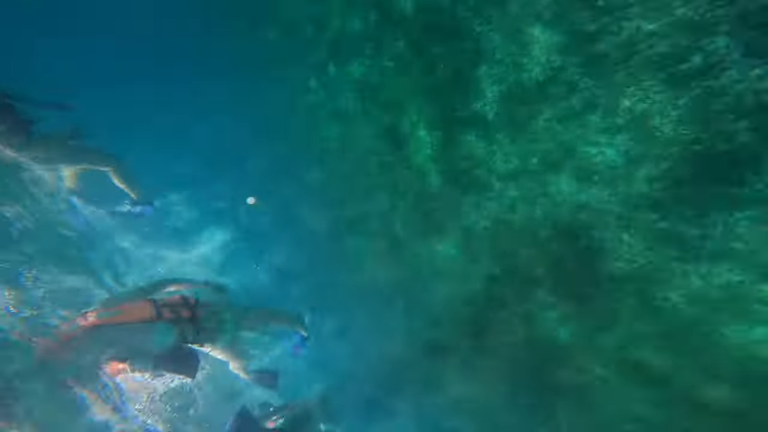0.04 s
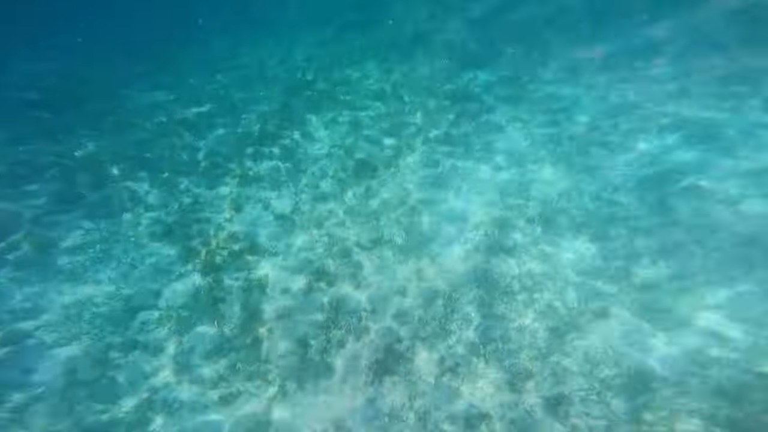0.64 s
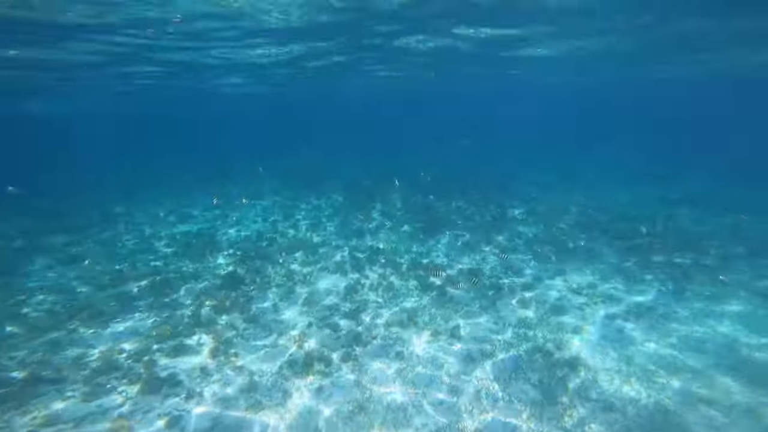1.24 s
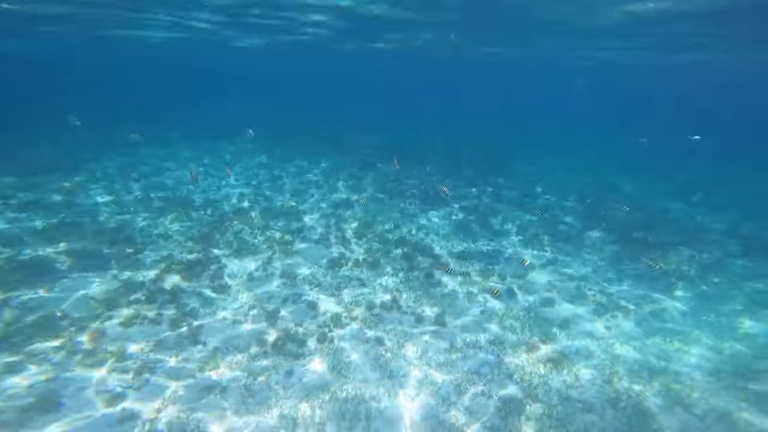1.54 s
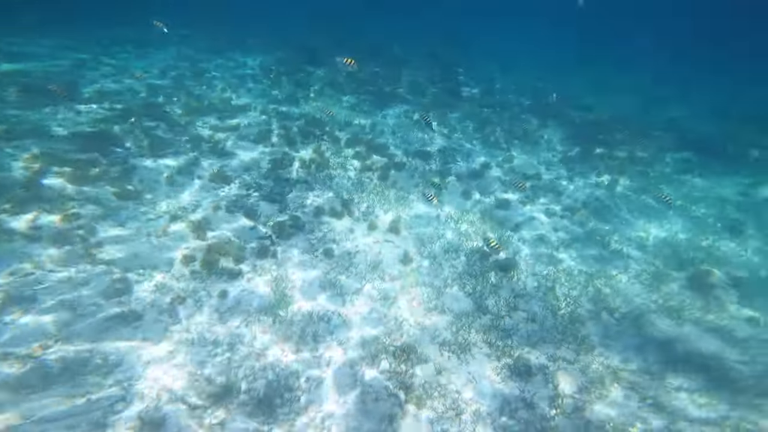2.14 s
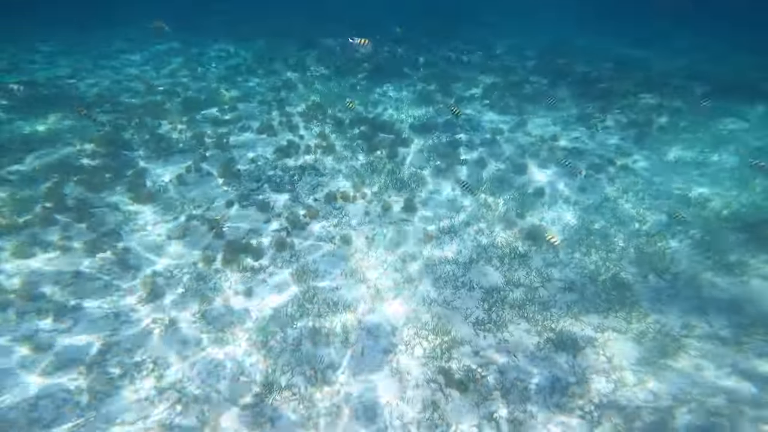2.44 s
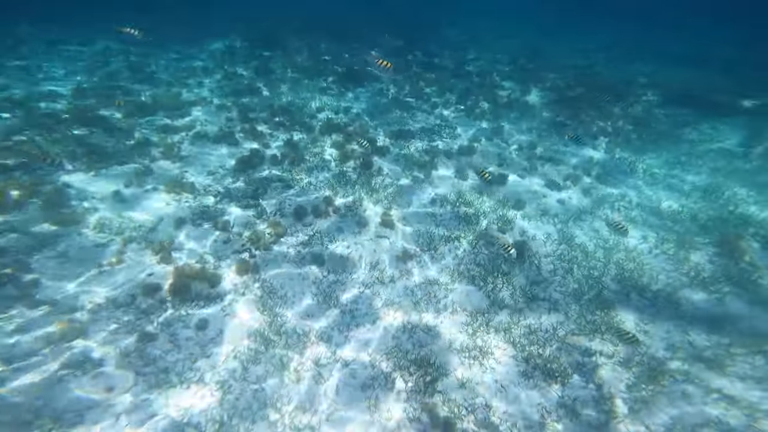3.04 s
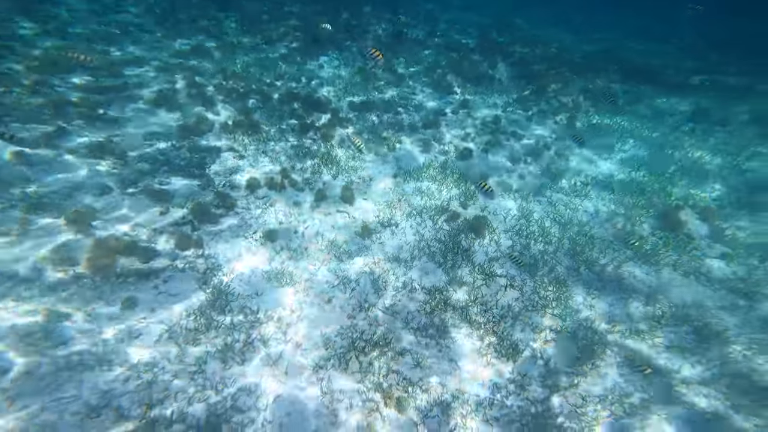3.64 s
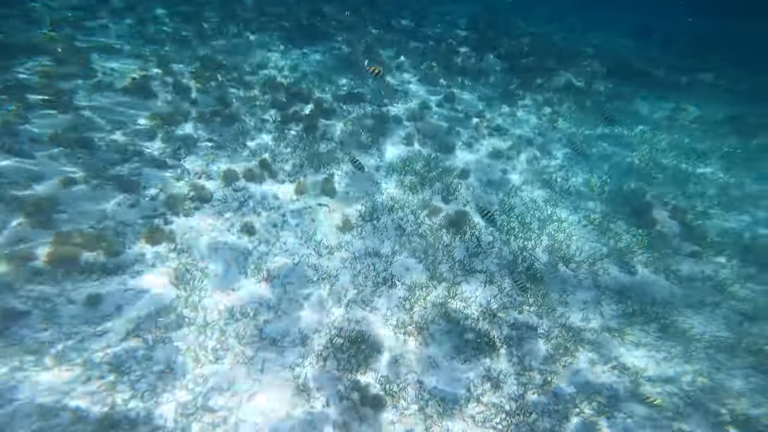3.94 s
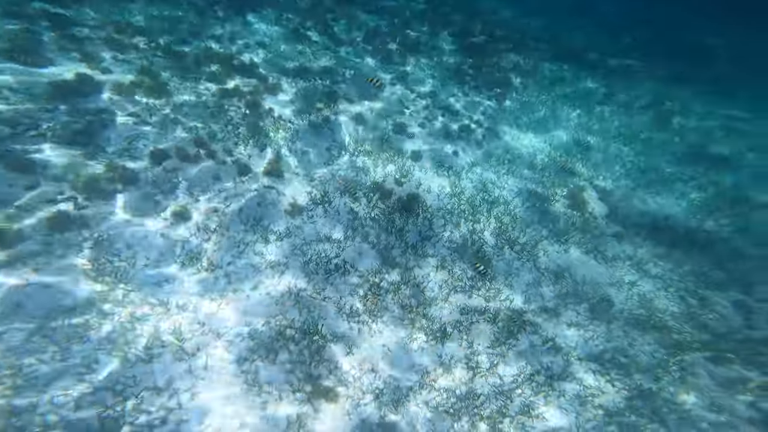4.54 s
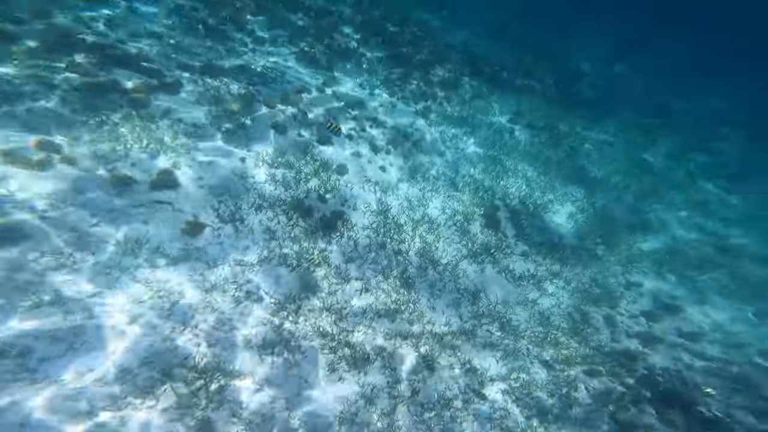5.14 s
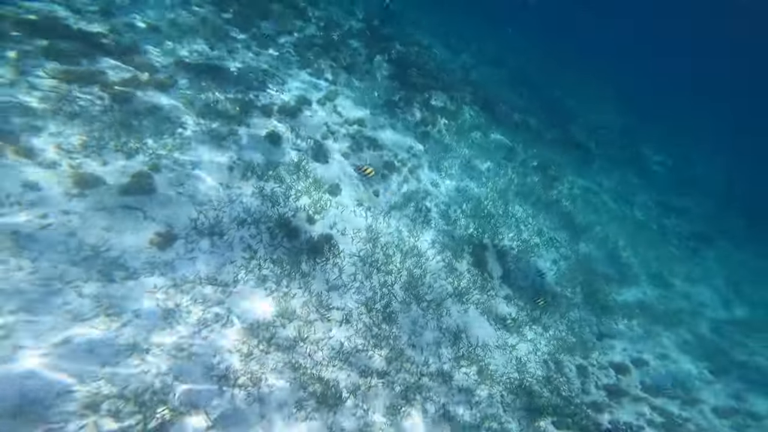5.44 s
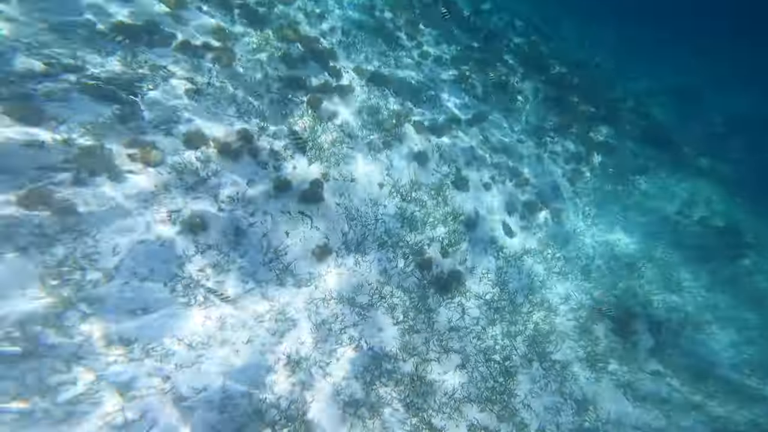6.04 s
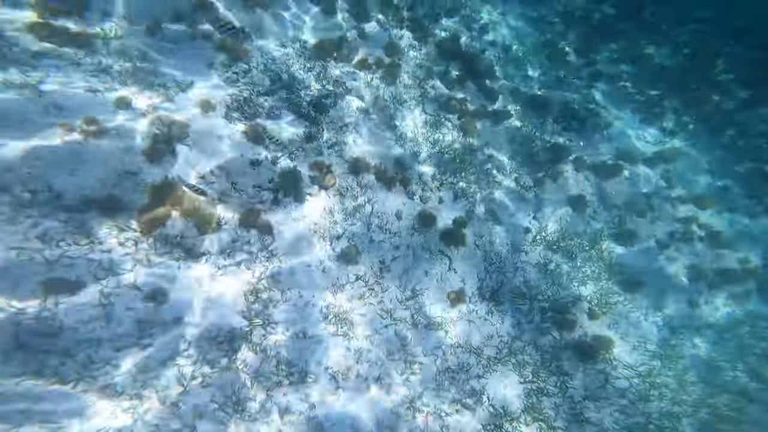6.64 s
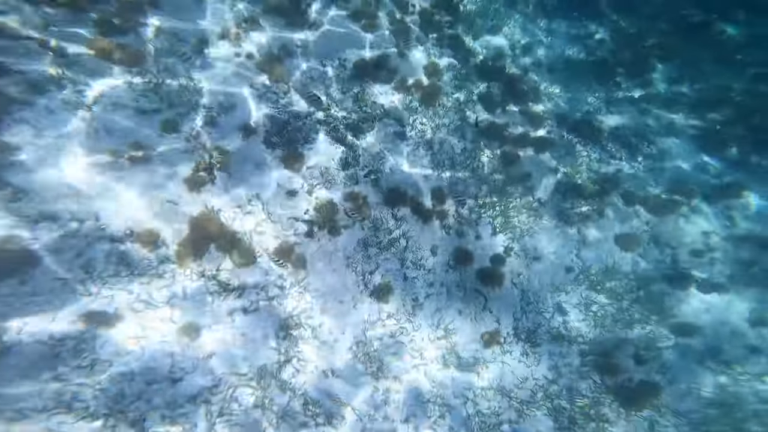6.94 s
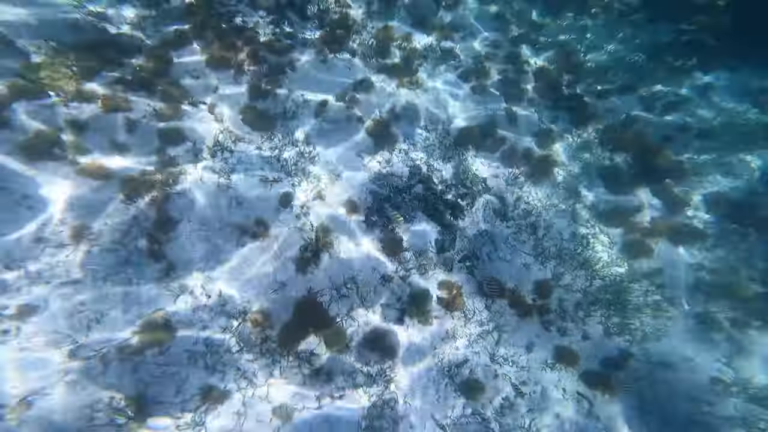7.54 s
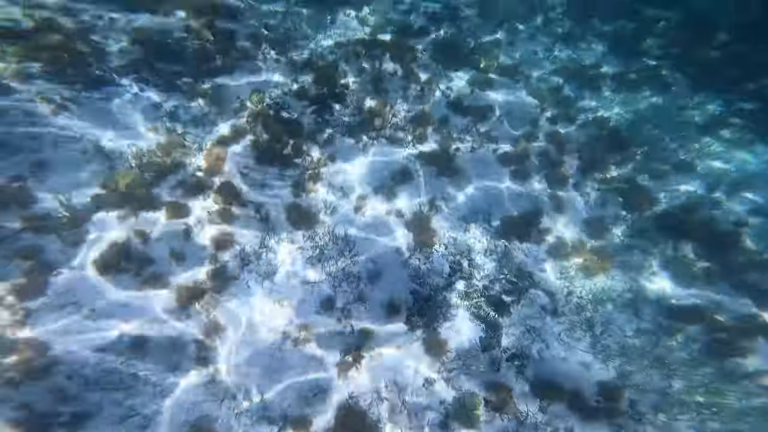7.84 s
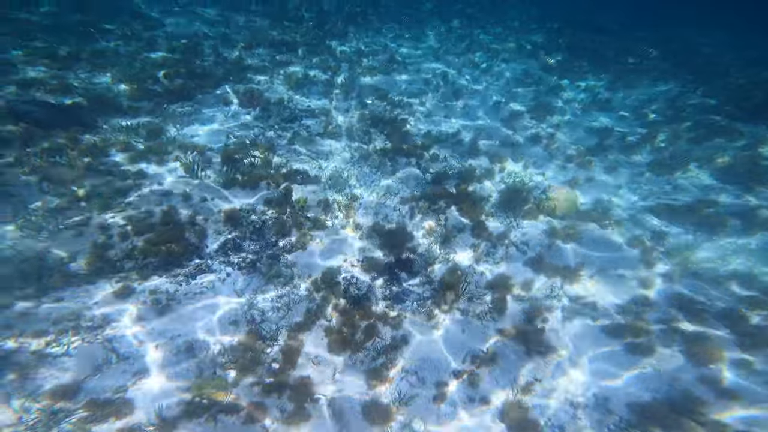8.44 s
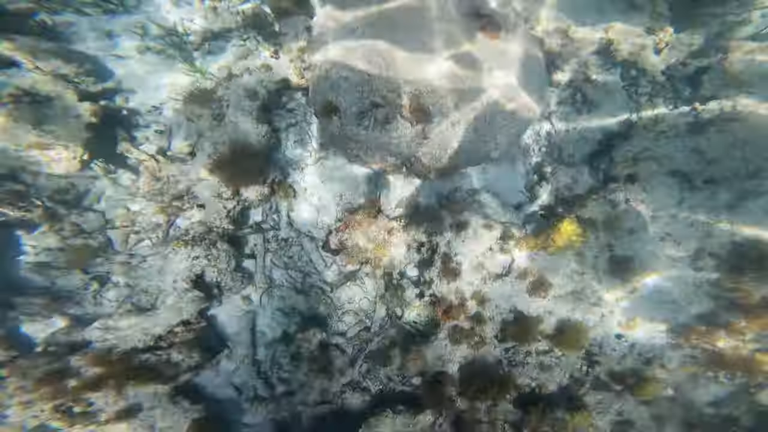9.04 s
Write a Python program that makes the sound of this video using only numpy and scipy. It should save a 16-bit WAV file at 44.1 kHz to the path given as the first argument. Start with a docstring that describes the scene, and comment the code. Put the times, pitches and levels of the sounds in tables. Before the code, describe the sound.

A muffled low rumble and soft burbling wash run throughout, heard from a hollow waterproof case just under the sea surface. From 0.2 to 1 second, close splashes crackle among glugs, snapping bubbles and dull knocks, the strongest at 0.7. A ringing glug and a sharp tick come around 1.3, as a string of bubbles rises in pitch until 1.8. Soft bumps sway the case between 2.2 and 3.2. It then grows quieter, with faint fizz and a thin hiss. Dull pops and a low bloop fall between 4.5 and 5.3, followed by more knocks and swelling rumble until 6.1. Glugs and small ringing bubbles cluster from 6.7 to 7, with another low bloop at 7.3. Louder glugs arrive around 7.9, then a sharp snap at 8.1. A tick, a glug and three hollow knocks come near 8.9, and the wash continues briefly.

```python
"""Snorkelling, heard from a waterproof case

A camera in a hollow case is carried just under the sea surface, near other swimmers. Eddies rumble
round the case, and bumps set it swaying and ringing. Close by, air pockets glug, splashes crackle and
small bubbles snap. Each bubble is an oscillator, its air the spring and the water the mass: the smaller,
the higher. Behind lie the wash of the churned surface and a fine fizz, coloured by the case's modes."""
import sys
import numpy as np
from scipy import signal
from scipy.fft import rfft, irfft, next_fast_len
from scipy.io import wavfile
from scipy.ndimage import uniform_filter1d

SR = 44100
rng = np.random.default_rng(int(sys.argv[2]) if len(sys.argv) > 2 else 0)


def bounce(signal):
    """Save signal as a 16-bit WAV file at the path given by the first command-line argument."""
    frames = np.transpose(np.atleast_2d(signal))
    limited = np.clip(frames, -1, 1)
    pcm = np.round(limited * 32767).astype(np.int16)
    wavfile.write(sys.argv[1], SR, pcm)


N = 410130

# bumps on the case: (time [s], relative level [dB], hollow ring against the push [dB])
CASE_BUMPS = [(0.223, -9, -3), (0.323, -12.5, -13), (0.66, -3, -3.5), (0.715, -10, -24), (0.929, -14.5, -6),
              (2.176, -10.5, -15.5), (2.256, -9.5, -5.5), (2.326, -11.5, -19), (2.462, -14, -8),
              (2.93, -18, -26), (3.174, -14, -11), (5.328, -11.5, -0.5), (5.41, -15.5, -18),
              (5.632, -15, -7.5), (5.887, -13, -17), (5.969, -14, -8), (6.143, -15, -38),
              (6.843, -11.5, -18), (7.98, -19, -18), (8.787, -13, -7), (8.838, -16, -2), (8.934, -9.5, 0)]


def amp(db):
    """Decibels to amplitude ratio."""
    return 10 ** (np.asarray(db) / 20)


def unit(x):
    """Normalisation to an rms of one."""
    return x / np.sqrt(np.mean(x ** 2) + 1e-20)


def together(a_db, b_db):
    """Incoherent sources add in power."""
    return 10 * np.log10(amp(a_db) ** 2 + amp(b_db) ** 2)


def curve(points):
    """Linear interpolation of a level at every sample."""
    return np.interp(np.arange(N) / SR, *np.transpose(points))


def at_hz(points, hz, column=1):
    """Interpolation on a log-frequency axis."""
    table = np.array(points, float)
    return np.interp(np.log(hz + 1), np.log(table[:, 0] + 1), table[:, column])


def add(mix, s, sound):
    """Superposition of a sound on the mix, from time s."""
    part = mix[:, max(round(s * SR), 0):][:, :sound.shape[-1]]
    part += sound[..., :part.shape[1]]


def pan(gain):
    """Level difference: the left side gains what the right loses, in decibels."""
    return np.array([[gain], [1 / gain]])


def wander(hz):
    """Slow random modulation: noise low-passed at hz."""
    return unit(irfft(rfft(rng.standard_normal(N)) / (1 + (np.fft.rfftfreq(N, 1 / SR) / hz) ** 4), N))


def grains(size, per_s, spread_db):
    """Shot noise: two trains of random impulses, a few of them large."""
    sizes = amp(spread_db * np.minimum(rng.exponential(1, (2, size)), 5))
    return unit(sizes * rng.choice([-1, 1], (2, size)) * (rng.random((2, size)) < per_s / SR))


def colour(x, law_db, size=4096):
    """Minimum-phase filter with the gain law_db(hz): it rings after each click, never before."""
    db = law_db(np.fft.rfftfreq(size, 1 / SR))
    log_gain = np.log(amp(np.maximum(db, db.max() - 100)))
    log_response = signal.hilbert(np.r_[log_gain, log_gain[-2:0:-1]]).conj()
    taps = np.fft.ifft(np.exp(log_response)).real
    return signal.oaconvolve(x, taps[None, :size // 2], axes=1)[:, :x.shape[1]]


def modes_db(hz):
    """Modal response: the case lifts its resonances and dips at its antiresonances."""
    # peaks and dips of the case: (frequency [Hz], width [Hz], lift [dB])
    case_modes = [(536, 64.5, 10), (1175, 230, 5.5), (1477.6, 236, 19.5), (1862, 197, 12.5),
                  (2138, 98, -6.5), (2290, 290, 6), (4220, 190, -3.5), (4640, 140, 2), (5680, 410, 2.5)]
    return sum(db * np.exp(-2 * ((hz - f) / width) ** 2) for f, width, db in case_modes)


def through_wall(x, ring):
    """Resonant colouring: a sound takes a share (ring) of the case modes and keeps its rms."""
    rung = colour(x, lambda hz: ring * modes_db(hz))
    return unit(rung) * np.sqrt(np.mean(x ** 2))


def ports(pair):
    """Partial coherence: two unrelated signals become alike in the bass, apart where the walls flex."""
    # the two microphones: (frequency [Hz], correlation [0-1], left minus right [dB])
    microphones = [(150, 1, 0), (546, 1, 2.5), (1000, 0.53, 0), (1680, 0.68, 5), (3000, 0.34, 0),
                   (4940, 0.94, -4.5), (8400, 0.93, 3)]
    size = next_fast_len(pair.shape[1] + SR // 20)
    hz = np.fft.rfftfreq(size, 1 / SR)
    a, b = rfft(pair, size)
    same = np.clip(at_hz(microphones, hz), 0, 1)
    lean = amp(at_hz(microphones, hz, column=2) / 2)
    mid, side = a * np.sqrt((1 + same) / 2), b * np.sqrt((1 - same) / 2)
    return irfft(np.array([(mid + side) * lean, (mid - side) / lean]), size)[:, :pair.shape[1]]


def burst(drive, centre_hz, db_per_octave, ring, top_hz):
    """Source and filter: a burst at the wall takes a spectral hump, the case modes and a treble cut."""
    hump = lambda hz: -db_per_octave * np.hypot(np.log2((hz + 20) / centre_hz), .5)
    muffle = lambda hz: -10 * np.log10(1 + (hz / top_hz) ** 14)
    return ports(colour(drive, lambda hz: hump(hz) + ring * modes_db(hz) + muffle(hz)))


def wobbling_tone(turns, rough, rough_hz):
    """A bubble's wobbling wall modulates its tone in amplitude and phase."""
    noise = rng.standard_normal((2, len(turns)))
    wobble, heave = unit(signal.lfilter(*signal.butter(2, rough_hz, fs=SR), noise))
    return (1 + rough * heave) * np.sin(2 * np.pi * turns + 2 * rough * wobble)


def pinch(hz, decay_s, rise, swell_s, rough, rough_hz, hold):
    """Pinch-off excites a damped oscillation of rising pitch; a larger hold rounds the fade."""
    t = np.arange(SR // 5) / SR
    turns = np.cumsum(hz * (1 + rise * (np.tanh(t / decay_s / 2) - .3))) / SR
    shape = (1 - np.exp(-(t / swell_s) ** 2)) * np.exp(-(t / decay_s) ** hold)
    return shape / shape.max() * wobbling_tone(turns, rough, rough_hz)


def cloud(low_hz, high_hz, level_db, per_s, spread_db, smooth, gust_db, gust_hz):
    """Countless bubbles of one size class sum to a gusting band of noise, filtered by the case."""
    # transmission through the case: (frequency [Hz], gain [dB])
    transmission = [(60, -19.5), (150, -14.5), (300, -18), (430, -7), (600, -14), (880, -24.5),
                    (1150, -26.5), (1300, -32.5), (2100, -28), (2800, -22.5), (4000, -30), (5500, -35),
                    (7500, -41), (9500, -55), (14000, -75)]
    drive = grains(N, per_s, spread_db) + smooth * rng.standard_normal((2, N))
    drive *= amp(gust_db * wander(gust_hz))
    band = lambda hz: -10 * np.log10((1 + (low_hz / (hz + 1)) ** 8) * (1 + (hz / high_hz) ** 8))
    sound = ports(colour(drive, lambda hz: at_hz(transmission, hz) + modes_db(hz) + band(hz)))
    return unit(sound) * amp(level_db)


def hiss():
    """Narrow-band noise: a whistly hiss swells and stops."""
    # swell of the hiss: (time [s], relative level [dB])
    swell = [(2.4, -61.5), (3.4, -54), (5.9, -55), (7.95, -50), (8.4, -65)]
    level_db = curve(swell) - 3
    return cloud(5400, 6100, level_db, per_s=1200, spread_db=1.5, smooth=1.8, gust_db=-0.1, gust_hz=22)


def strays(low_hz, high_hz, level_db, cycles, count, rise=0.141, spread_db=4.5):
    """Single bubbles ring as damped oscillators at random moments, following their cloud's level."""
    t, out = np.arange(SR // 6) / SR, np.zeros((2, N))
    for when, pitch, size, side in rng.random((count, 4)):
        hz = low_hz * (high_hz / low_hz) ** pitch
        age = t * hz / cycles
        turns = np.cumsum(hz * (1 + rise * np.tanh(age / 2))) / SR
        ping = np.sin(2 * np.pi * turns) * np.tanh(2 * age) * np.exp(-age)
        db = level_db[int(when * N)] - spread_db * np.log(size + 0.025)
        lean = amp((side - .5) * hz / high_hz * 2)  # large bubbles sit in the middle
        add(out, when * N / SR, amp(db) * pan(lean) * ping)
    return out


def pops(decay_s=0.0061, gain_db=5.5):
    """Impulse excitation: a bubble collapses a little way off and rings the case's middle modes."""
    # dull pops: (time [s], relative peak [dB])
    collapses = [(1.929, -39), (2.2546, -37), (3.457, -33), (4.5353, -28.5), (4.8806, -30.5), (4.9697, -25),
                 (5.2568, -30), (6.763, -30), (6.899, -34), (6.946, -34), (8.021, -29.5), (8.357, -38)]
    t, out = np.arange(SR // 20) / SR, np.zeros((2, N))
    for s, db in collapses:
        puff = rng.standard_normal((2, len(t))) * np.exp(-t / decay_s)
        sound = burst(puff, centre_hz=1900, db_per_octave=9, ring=0.94, top_hz=6000)
        add(out, s, amp(db + gain_db) * sound / abs(sound).max())
    return out


def ticks(decay_s=0.00043):
    """A brief pulse has a broad spectrum: dry, bright ticks with no ring."""
    # ticks: (time [s], peak [dB])
    pulses = [(1.3277, -11), (8.7875, -20)]
    t, out = np.arange(SR // 100) / SR, np.zeros((2, N))
    for s, db in pulses:
        add(out, s, amp(db) * np.exp(-t / decay_s))
    return out


def stream(per_s=1300, scatter=0.12, cycles=3.9, spread_db=5.0, gain_db=-2.0, spurt_hz=68, bunch=0.88):
    """Pitch varies inversely with radius: ever smaller bubbles escape, so their common ring climbs."""
    # string of bubbles along the case: (time [s], relative level [dB], pitch [Hz])
    escape = [(1.24, -22, 1460), (1.30, -31.5, 1530), (1.38, -40.5, 1600), (1.47, -29, 1790),
              (1.62, -37.5, 1730), (1.71, -31, 2070), (1.746, -46, 2200)]
    times, level_db, pitch_hz = np.transpose(escape)
    t, out = np.arange(SR // 30) / SR, np.zeros((2, N))
    births = rng.uniform(times[0], times[-1], round(per_s * (times[-1] - times[0])))
    births += bunch * np.sin(2 * np.pi * spurt_hz * births) / (2 * np.pi * spurt_hz)  # air in spurts
    for s, (size, detune, side) in zip(births, rng.standard_normal((len(births), 3))):
        hz = np.interp(s, times, pitch_hz) * np.exp(scatter * detune)
        age = t * hz / cycles
        ping = np.sin(2 * np.pi * hz * t) * np.tanh(2 * age) * np.exp(-age)
        db = np.interp(s, times, level_db) + spread_db * size + gain_db
        add(out, s, amp(db) * pan(amp(2 * side + 2)) * ping)
    return through_wall(out, ring=0.35)


def bubbles(cycles=7.7, shed_count=3, shed_db=-15.5, shed_s=0.018, shed_octaves=0.54):
    """Minnaert resonance: bubbles ring by size, chirp up as they near the surface and shed smaller ones."""
    # free bubbles close by: (time [s], level [dB], pitch [Hz])
    free_bubbles = [(.222, -16, 1134), (.458, -26, 1900), (0.842, -22.5, 1345), (.894, -22, 965),
                    (0.935, -15.5, 1600), (1.257, -17, 3060), (2.063, -30, 1470), (2.303, -28.5, 1020),
                    (2.317, -30, 1340), (3.555, -26.5, 4020), (4.938, -15, 305), (6.764, -25.5, 2930),
                    (6.82, -34, 3300), (6.827, -30, 1500), (6.844, -24, 780), (6.89, -33, 1065),
                    (6.947, -28, 1065), (7.306, -17.5, 351), (7.901, -20, 830), (8.019, -21, 2010),
                    (8.49, -32.5, 1630), (8.625, -30.5, 1730)]
    out = np.zeros((2, N))
    chirp = lambda hz: pinch(hz, cycles / hz, 0.092, swell_s=0.0012, rough=0.26, rough_hz=297, hold=1.1)
    for s, db, hz in free_bubbles:
        add(out, s, amp(db) * chirp(hz))
        for late, higher, size, side in rng.random((shed_count, 4)):
            gains = amp(db + shed_db) * 2 * size * np.array([[side], [1 - side]])
            add(out, s + shed_s * late, gains * chirp(hz * 2 ** (shed_octaves * higher)))
    return out


def gulp(start_s=0.198, level_db=-16, hz=1794, neck_s=0.03, swell_s=0.0052, decay_s=0.0037):
    """Growth and decay: air squeezed from a gap in the case rings up as its neck narrows, then parts."""
    t, out = np.arange(SR // 10) / SR, np.zeros((2, N))
    shape = np.minimum(np.exp((t - neck_s) / swell_s), np.exp((neck_s - t) / decay_s))
    tone = wobbling_tone(hz * t, rough=0.53, rough_hz=170)
    add(out, start_s, amp(level_db) * np.tanh(2 * shape) * tone)
    return out


def glugs(thud_hz=300, thud_s=0.002):
    """Volume pulsation: air pockets let go with a soft thud and ring near the case's hollow note."""
    # air pockets: (time [s], level [dB], pitch [Hz], decay time [s])
    pockets = [(0.22, -13, 530, 0.016), (0.647, -10, 500, 0.0083), (0.768, -14.5, 527, 0.012),
               (0.806, -14, 460, 0.014), (0.859, -15.5, 533, 0.012), (1.242, -13, 538, 0.045),
               (6.671, -21, 536, 0.022), (6.712, -16.5, 537, .016), (6.758, -14.5, 525, 0.015),
               (6.799, -17, 514, 0.012), (7.843, -12.5, 524, 0.012), (7.861, -19, 635, 0.024),
               (7.898, -9, 573, 0.013), (7.968, -11.5, 589, 0.019), (7.978, -11, 532, 0.013),
               (8.048, -12.5, 535, 0.012), (8.356, -19.5, 594, 0.007), (8.89, -14, 591, 0.01)]
    t, out = np.arange(SR // 5) / SR, np.zeros((2, N))
    thud = 0.65 * np.sin(2 * np.pi * thud_hz * t) * t / thud_s * np.exp(1 - t / thud_s)
    for s, db, hz, decay_s in pockets:
        glug = pinch(hz, decay_s, rise=0.15, swell_s=0.0022, rough=0.12, rough_hz=203, hold=1.73)
        add(out, s, amp(db) * (thud + glug))
    return out


def splash_bubbles(shape, centre_hz, octaves=0.602, cycles=6, count=10):
    """Convolution: each of several bubble sizes rings at its own random impulses."""
    t, out = np.arange(SR // 30) / SR, 0
    offsets = 2 * (np.arange(count) + rng.random(count)) / count - 1
    for hz in centre_hz * 2 ** (octaves * offsets):
        age = t * hz / cycles
        ping = np.sin(2 * np.pi * hz * t) * np.tanh(5 * age) * np.exp(-age)
        births = grains(len(shape), per_s=55, spread_db=7.0) * shape
        out = out + signal.oaconvolve(births, ping[None], axes=1)[:, :len(shape)]
    return ports(out)


def splashes(bubbles_db=2):
    """Air entrainment: torn water gives a tight cluster of crackles and ringing bubbles."""
    # splashes: (time [s], rms level [dB], length [s], centre frequency [Hz])
    tears = [(0.219, -27.5, 0.016, 1530), (0.633, -30.5, 0.035, 1050), (0.71, -28.5, 0.0083, 1520),
             (0.817, -24.5, 0.032, 970), (0.855, -36, 0.017, 5650), (0.916, -22.5, 0.031, 1700),
             (0.958, -30, 0.014, 2670), (1.236, -35, 0.024, 1510), (1.432, -48, 0.11, 4730),
             (1.731, -26.5, 0.0086, 1705), (2.135, -53.5, 0.085, 5400)]
    t, out = np.arange(SR // 4) / SR, np.zeros((2, N))
    for s, db, length_s, centre_hz in tears:
        age = t / length_s
        shape = np.tanh(10 * age) / (1 + age ** 10)
        drive = grains(len(t), per_s=1100, spread_db=5.0) * shape
        crackle = burst(drive, centre_hz, db_per_octave=19, ring=0.28, top_hz=6500)
        sound = unit(crackle) + amp(bubbles_db) * unit(splash_bubbles(shape, centre_hz))
        add(out, s, amp(db) * unit(sound) * np.sqrt(np.mean(shape ** 2)))
    return out


def snaps(crack_hz=4600, split=0.079, swell_s=0.00065, decay_s=0.0018, wall_s=0.0035, gain_db=2.0):
    """Transient response: a bubble bursts on the case with a crack, two close tones and a wall note."""
    # small bursting bubbles: (time [s], relative crack peak [dB], relative wall peak [dB])
    bursts = [(.233, -23.5, -42), (0.3238, -34, -25), (0.3695, -38, -18), (.822, -17, -17),
              (.841, -22, -32), (.883, -34, -42), (.916, -15, -10), (0.924, -17, -19), (.9325, -32, -12.5),
              (.9405, -15.5, -19), (0.9756, -16.5, -21), (1, -19.5, -29), (1.0292, -27, -20),
              (1.13, -20, -40), (1.1442, -19, -40), (1.2563, -37, -14.5), (1.442, -19, -36),
              (1.498, -23.5, -32), (1.582, -30.5, -45), (1.744, -18.5, -23), (2.009, -37, -31.5),
              (2.371, -36, -34), (6.704, -29.5, -48), (8.1343, -12, -14)]
    t, out = np.arange(SR // 20) / SR, np.zeros((2, N))
    shape = np.tanh(t / swell_s) * np.exp(-t / decay_s)
    for s, crack_db, wall_db in bursts:
        hz = crack_hz * np.exp(split * rng.standard_normal())
        pair_hz = [hz * (1 + side * split * (.5 + rng.random())) for side in (-1, 1)]
        plink = sum(np.sin(2 * np.pi * f * t) for f in pair_hz)
        drive = (rng.standard_normal((2, len(t))) + 0.3 * plink) * shape
        crack = burst(drive, hz, db_per_octave=24, ring=0.42, top_hz=5900)
        puff = rng.standard_normal((2, len(t))) * np.exp(-t / wall_s)
        wall = burst(puff, centre_hz=2300, db_per_octave=12, ring=0.57, top_hz=5900)
        sound = amp(crack_db) * crack / abs(crack).max() + amp(wall_db) * wall / abs(wall).max()
        add(out, s, amp(gain_db) * sound)
    return out


def flow(gain_db=-1, wake_db=-1.5, wake_lead_s=0.008, wake_s=0.025):
    """Turbulent pressure: eddies rumble on the case, alike on both sides, swelling round each bump."""
    # flow round the case: (time [s], relative level [dB])
    flow_levels = [(0, -21.5), (.95, -13.5), (2, -22), (2.3, -15.5), (2.63, -25), (2.95, -15), (3.4, -29.5),
                   (4.15, -28.5), (4.75, -21.5), (5.5, -16), (5.8, -28), (5.98, -13.5), (6.28, -24.5),
                   (6.85, -24.5), (7.9, -22), (8.6, -25), (8.9, -19.5), (9.25, -19.5)]
    # spectrum of the eddies: (frequency [Hz], gain [dB])
    spectrum = [(10, -24), (20, 8.5), (29, 6.5), (44, -4), (60, -5), (80, -20), (130, -23.5), (300, -96.5)]
    hz, t = np.fft.rfftfreq(N, 1 / SR), np.arange(N) / SR
    eddies = unit(irfft(rfft(rng.standard_normal(N)) * amp(at_hz(spectrum, hz)), N))
    envelope = uniform_filter1d(abs(signal.hilbert(eddies)), size=3000)
    power = amp(curve(flow_levels) + gain_db) ** 2
    for s, db, _ in CASE_BUMPS:
        age = np.maximum(t - s + wake_lead_s, 0) / wake_s
        power += (amp(db + wake_db) * 2 * age / (1 + age ** 3)) ** 2
    return unit(eddies / envelope) * np.sqrt(power)


def bumps(push_s=0.0024, sway_hz=31, sway_q=1.6, thud_hz=225, hollow_hz=500, decay_s=0.007, gain_db=2.5):
    """Forced vibration: a rounded push sways the case, thuds in its wall and rings the air inside."""
    t, out = np.arange(SR // 5) / SR, np.zeros((2, N))
    omega = 2 * np.pi * sway_hz
    resonator = signal.bilinear([1, 0, 0], [1, omega / sway_q, omega * omega], SR)
    lowpass = signal.butter(5, 620, fs=SR)
    pitch_sag = 1 - 0.14 * np.tanh(t / decay_s / 2)
    variations = np.exp(0.28 * (2 * rng.random((len(CASE_BUMPS), 2)) - 1))
    for (s, db, hollow_db), (softness, detune) in zip(CASE_BUMPS, variations):
        age = t / (push_s * softness)
        sway = signal.lfilter(*resonator, (age * np.exp(1 - age)) ** 3)
        phase_per_hz = 2 * np.pi * detune * t * pitch_sag
        hollow = amp(hollow_db) * np.sin(hollow_hz * phase_per_hz)
        thud = 0.55 * np.sin(thud_hz * phase_per_hz)
        knock = (hollow + thud + 0.65 * rng.standard_normal(len(t))) * np.exp(-t / decay_s)
        add(out, s, amp(db + gain_db) * signal.lfilter(*lowpass, sway + knock))
    return out


def scene():
    """Superposition: four sizes of bubble cloud and their strays lie behind the flow and near events."""
    # water churning near the case: (time [s], relative level [dB])
    churn_levels = [(0, -36), (.78, -29.5), (1.54, -33), (1.8, -41), (2.6, -45), (3.66, -43), (3.9, -37.5),
                    (5.46, -35.5), (6.2, -40.5), (6.85, -33.5), (7.02, -37), (8.88, -32), (9.3, -36.5)]
    # fine fizz further off: (time [s], relative level [dB])
    fizz_levels = [(0, -54), (.62, -52.5), (1.26, -60), (2.7, -59.5), (4.14, -50), (4.74, -48),
                   (6.18, -57.5), (7.9, -50.5), (8.42, -63.5), (9, -57.5), (9.3, -71.5)]
    churn_db, fizz_db = curve(churn_levels), curve(fizz_levels)
    slosh_db = -28 + 1.63 * (churn_db + 28)  # large bubbles gain level faster than the churn
    froth_db = together(churn_db - 16, fizz_db + 6)  # middle sizes come with both churn and fizz
    slosh = cloud(112, 301, slosh_db - .5, per_s=120, spread_db=4, smooth=.41, gust_db=2.5, gust_hz=11)
    churn = cloud(335, 690, churn_db + .5, per_s=200, spread_db=2, smooth=.69, gust_db=2.5, gust_hz=23.4)
    froth = cloud(1140, 2830, froth_db + .5, per_s=900, spread_db=3, smooth=1, gust_db=2, gust_hz=30.2)
    fizz = cloud(3950, 15000, fizz_db + 1, per_s=900, spread_db=6, smooth=1.7, gust_db=2.02, gust_hz=31)
    wash = slosh + churn + froth + fizz + hiss()
    burble = strays(155.1, 339.3, slosh_db, cycles=12.6, count=130)
    burble += strays(401, 651, churn_db, cycles=6.46, count=260)
    blips = strays(620, 926, slosh_db - 2, cycles=3.86, count=560, spread_db=2.5)
    plinks = through_wall(strays(1300, 2900, froth_db + 2, cycles=4, count=200, spread_db=5), ring=0.3)
    pips = strays(2800, 6000, froth_db + 2.5, cycles=6, count=130)
    near = bumps() + glugs() + gulp() + bubbles() + splashes() + stream() + snaps() + pops() + ticks()
    return wash + burble + blips + plinks + pips + flow() + near


def record(dry, ceiling=0.86, edge_hz=15700):
    """Soft saturation rounds off the largest bumps; a low-pass sets the camera's band limit."""
    rounded = dry / (1 + (dry / ceiling) ** 8) ** (1 / 8)
    lowpass = signal.firwin(511, edge_hz, window=("kaiser", 9), fs=SR)
    return signal.oaconvolve(rounded, lowpass[None], "same")


dry = scene()
out = record(dry)
bounce(out)
```